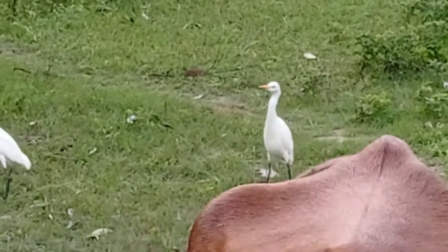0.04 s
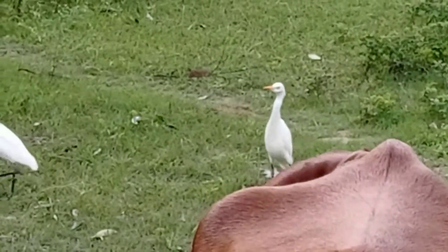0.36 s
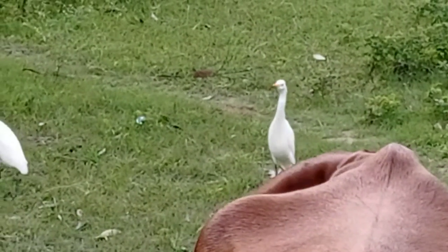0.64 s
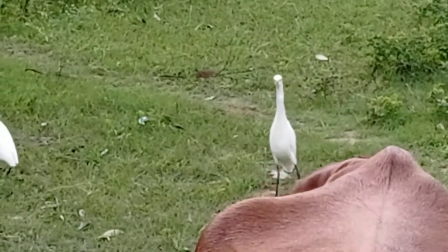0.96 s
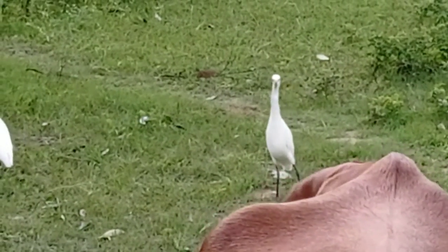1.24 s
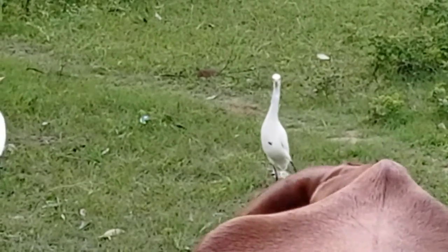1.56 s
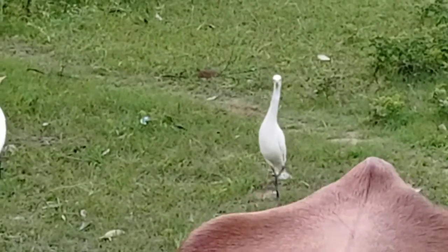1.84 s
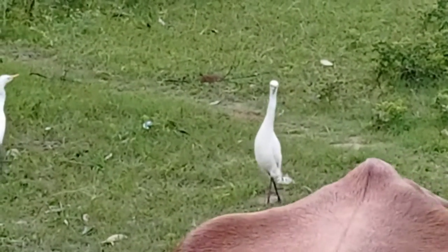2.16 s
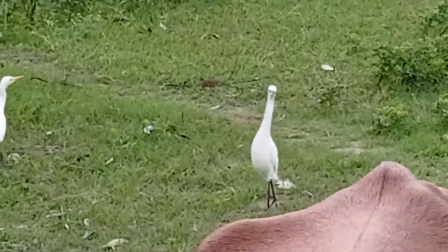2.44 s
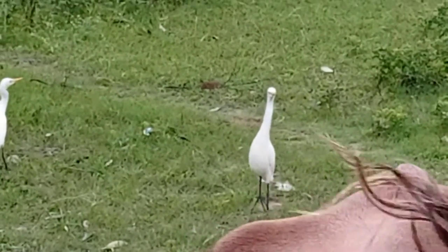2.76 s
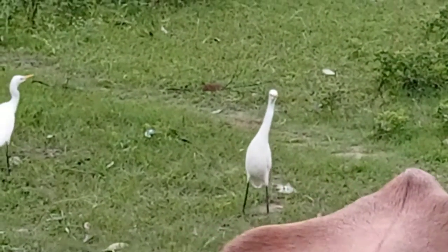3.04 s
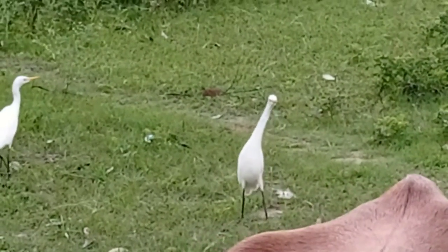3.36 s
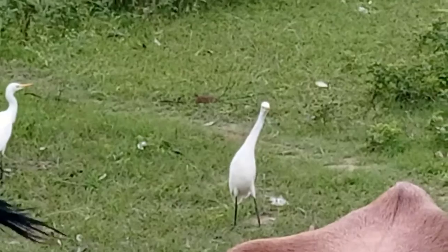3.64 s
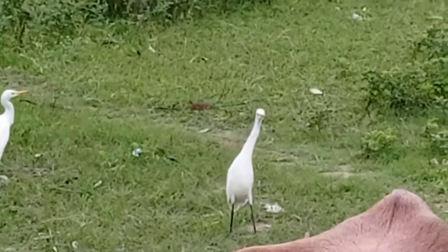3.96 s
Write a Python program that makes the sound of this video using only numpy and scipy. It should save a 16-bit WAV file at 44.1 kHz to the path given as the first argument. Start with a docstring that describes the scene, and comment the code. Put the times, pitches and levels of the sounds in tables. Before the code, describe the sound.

Small birds calling, one nearer repeating a quick phrase, with light wind on the microphone.

```python
"""Small birds call in an open pasture. From the start, wind rumbles softly under far twitters, chips and
whistles: gliding tones that the trees scatter back as a faint wash. A cow's tail swishes twice, hair
brushing hide with tiny snaps, while far chirps, trills and thin rasps join in. From 1.5 s the nearest
bird repeats a short phrase three times a second, another buzzes, and the wind gives one low thump.
Toward 4 s the near bird and the wind fade while the other birds call on."""
import sys
import numpy as np
from scipy import signal
from scipy.io import wavfile

SR = 44100
rng = np.random.default_rng(int(sys.argv[2]) if len(sys.argv) > 2 else 0)


def bounce(signal):
    """Save signal as a 16-bit WAV file at the path given by the first command-line argument."""
    frames = np.transpose(np.atleast_2d(signal))
    limited = np.clip(frames, -1, 1)
    pcm = np.round(limited * 32767).astype(np.int16)
    wavfile.write(sys.argv[1], SR, pcm)


N = 176400

# How the wind's low rumble and the field's airy rush rise and fall: time_s, level_db
RUMBLE_LEVELS = [(0, -43.5), (.6, -42), (1.1, -43.5), (1.6, -43), (2.1, -43.5), (2.8, -46.5), (3.2, -49.5),
                 (3.6, -53.5), (4, -53.5)]
RUSH_LEVELS = [(0, -58), (.9, -58.5), (1.9, -59.5), (2.6, -61), (3.2, -65), (4, -72)]
# How strong the lows and highs are in the rumble, the rush and a tail swish: frequency_hz, level_db
RUMBLE_COLOUR = [(20, -11), (35, -7.5), (48, -4.5), (59, 1.5), (75, -6.5), (100, -11), (170, -11.5),
                 (250, -21.5), (400, -34), (800, -66.5)]
RUSH_COLOUR = [(120, -6), (200, 4.5), (320, 4.5), (500, -5), (780, -0.5), (1100, -8), (1600, -13),
               (2500, -18.5), (4300, -24), (6000, -28.5), (8000, -38), (11500, -35.5), (15000, -59)]
SWISH_COLOUR = [(1000, -12), (2700, 4), (4500, 1.5), (7500, -1), (11000, -14.5), (14000, -18)]
# How alike noise is at the two ears (1 means the same): frequency_hz, likeness
EAR_LIKENESS = [(30, 1), (70, .98), (170, 0.91), (350, 0.65), (700, 0.23), (1400, -0.3), (3000, 0.11),
                (9000, 0.16)]
# Bouts of far twittering: start_s, length_s, level_db, pitch_hz, spread_octaves, notes_per_s
TWITTER_BOUTS = [(0, 0.29, -69.5, 2900, .15, 25), (0, .72, -67.5, 4300, .15, 29.6),
                 (.7, 0.48, -70, 4115, .2, 25), (2.0, 1.09, -60, 2895, .12, 30),
                 (2.32, .75, -61, 3453, 0.1194, 35), (2.35, 0.64, -69, 4350, .15, 29),
                 (3.101, .6, -69, 2900, .2, 20.4)]
# The path each kind of call follows, by name: time_in_call_s, pitch_hz, level_db
CALL_SHAPES = { "upsweep": [(0, 3300, -11), (.010, 3790, -6.5), (.019, 4560, -1.5), (.027, 5880, -3),
               (.031, 6000, -33)], "chip": [(0, 6120, -13), (.006, 5340, 2.5), (.013, 4450, 1),
               (.021, 3600, -15), (.030, 3100, -26)], "tick": [(0, 5404, -13), (.005, 4000, 1.5),
               (.012, 2900, 5), (.019, 2400, 1.5), (.023, 2420, -17)], "dip": [(0, 4200, -13),
               (.017, 3680, 1), (.042, 3485, 1.5), (.065, 3240, -3), (.084, 3233, -1.5), (.115, 3560, 0),
               (.140, 3816, 3), (.153, 3830, -30)], "hook": [(0, 5950, -9), (.009, 5100, -2),
               (.018, 4300, -1), (.035, 4020, 0.5), (.054, 4110, -6), (.073, 4260, -6.5),
               (.088, 4100, -15)], "whistle": [(0, 3127, -13), (.018, 3076, 0), (.060, 3044, -1.5),
               (.088, 3190, 3.5), (.108, 3040, -15)], "thin": [(0, 7150, -21), (.030, 7350, 2.5),
               (.070, 7360, -3), (.120, 7210, 1), (.145, 7250, -10)], "pipe": [(0, 2235, -15),
               (.014, 2210, -2), (.041, 2185, -2), (.056, 2185, -14)], "level": [(0, 3820, -3.5),
               (.025, 3804, 1), (.110, 3790, -3.5), (.160, 3760, -10)], "flick": [(0, 3950, -8),
               (.010, 4270, -2.5), (.020, 4600, -0.5), (.027, 5120, -10)], "lift": [(0, 2910, -17),
               (.030, 3190, -8), (.052, 3420, -6), (.07, 3480, -1)], }
# How much each kind of call wobbles in pitch (the rest waver slightly): shape_name, share_of_pitch
CALL_WAVER = {"upsweep": 0.041, "tick": .07, "chip": 0.013, "flick": .015, "level": .009, "thin": .004}
# Calls round the field: start_s, shape_name, level_db, pitch_ratio, right_ear_lag_cycles, wash_db
CALLS = [ (.046, "upsweep", -53, 1, 0.33, -5.5), (.206, "upsweep", -55, .97, .4, -7),
         (.371, "upsweep", -54, 1, 0.35, -7.5), (.022, "chip", -62.5, 0.62, 0.41, -1.5),
         (.183, "chip", -68, .6, 0.32, -6), (.343, "chip", -69, .62, 0.42, -7),
         (.128, "pipe", -57.5, 1, 0.5, -13), (.258, "pipe", -57.5, 1, .52, -3),
         (2.265, "pipe", -63, .97, 0.37, 4.5), (3.455, "pipe", -66, 1, .45, -8),
         (3.595, "pipe", -64.5, 1.01, 0.3, -2), (.232, "thin", -65.5, 1, 0.031, -5.5),
         (0.519, "thin", -65.5, .995, 0.047, -1), (1.786, "tick", -61, 1, .25, -5),
         (2.114, "tick", -59, 1, .25, -5), (2.435, "tick", -58.5, 1.05, .3, -4),
         (2.756, "tick", -63, 1.05, .3, -4), (3.114, "dip", -56.5, .9, 0.21, -11),
         (3.422, "dip", -54, 1, 0.22, -9), (3.289, "flick", -56.5, 1, 0.35, -1),
         (3.331, "chip", -51, 1.01, -0.33, -11), (3.612, "hook", -51.5, 1, 0.39, -9.5),
         (3.044, "lift", -56, 1.08, .29, -2), (3.738, "whistle", -59.5, 1, 0.071, -7),
         (2.755, "whistle", -62.5, 1.02, .1, 0), (3.015, "level", -63, 1.028, 0.19, -1.5),
         (3.435, "level", -60.5, 1.015, 0.23, -5.5), (3.848, "level", -65.5, 1, -0.15, -20),
         (3.422, "whistle", -59.5, .89, 0.089, -10), (3.930, "lift", -55, 1, 0.033, -8)]
# Strokes of the cow's tail: middle_s, half_length_s, level_db
TAIL_STROKES = [(0.443, 0.018, -65), (1.281, 0.021, -60)]
# Tiny dry snaps, most within the swishes: start_s, level_db, low_edge_hz
DRY_SNAPS = [(.440, -55, 2500), (.451, -58, 3000), (1.280, -59, 2000), (2.405, -65, 8500)]
# Far chirps: start_s, level_db, pitch_ratio
CHIRPS = [(.548, -66, 1), (.632, -68, 1.46), (.705, -66, 0.84), (.735, -62.5, 1.01), (.765, -69, .72),
          (.785, -62, .83), (1.08, -72, .64), (1.16, -72, 0.92), (1.295, -65, 0.84), (1.41, -69, 0.71)]
# The path of one far chirp: time_in_call_s, pitch_hz, level_db
CHIRP_SHAPE = [(0, 3597, -11), (.015, 3250, 0), (.035, 3150, 0), (.06, 3443, -7)]
# Far trills: start_s, length_s, level_db, pitch_hz, fall_share_of_pitch, notes_per_s
TRILL_RUNS = [(.85, 0.29, -67.5, 3520, .06, 40), (.66, .44, -67.5, 4550, 0.14, 40),
              (1.15, .65, -70, 3280, .03, 32), (1.96, 1.24, -61, 2950, 0.243, 27),
              (2.325, 0.12, -52.5, 3590, 0.045, 80), (2.32, .15, -71.5, 5000, .03, 57),
              (2.66, .25, -73, 5000, .04, 37)]
# High, faint rasps: start_s, length_s, level_db, pitch_hz
RASP_NOTES = [(.97, 0.087, -79, 6800), (1.11, 0.056, -73.5, 5750), (1.298, .03, -70, 7240),
              (1.388, 0.06, -74, 6580), (1.585, 0.08, -74.5, 7130), (1.785, 0.079, -77, 6900),
              (1.985, 0.061, -75, 7210), (2.175, 0.074, -78.5, 7190), (2.71, 0.081, -74, 8190),
              (2.89, .07, -78.5, 7870), (2.983, 0.082, -77.5, 6090), (3.289, 0.082, -84, 7800),
              (3.568, 0.082, -82, 8000), (3.833, 0.065, -83.5, 7930)]
# The near bird's phrases: start_s, level_db
NEAR_PHRASES = [(1.517, -52), (1.852, -45), (2.177, -46), (2.500, -46), (2.820, -49), (3.149, -50.5),
                (3.485, -54.5), (3.832, -57)]
# Its four notes (the pip comes just ahead of the start): time_in_phrase_s, pitch_hz, level_db
PIP_NOTE = [(-.032, 2500, -10.5), (-.024, 2432, -5), (-.013, 2410, -8), (-.004, 2390, -31.5)]
SLUR_NOTE = [(0, 2946, -15), (.010, 2738, -2), (.022, 2627, -0.5), (.034, 2586, 0.5), (.042, 2580, -5),
             (.048, 2630, -1)]
RISE_NOTE = [(.081, 2780, -19), (.090, 2978, -7), (.098, 3066, -6), (.105, 3235, -4), (.113, 3330, -5.5),
             (.123, 3220, -12.5)]
DROP_NOTE = [(.136, 2230, -12.5), (.143, 2170, -10), (.151, 2042, -3), (.158, 1843, -14.5),
             (.168, 1740, -18.5), (.190, 1732, -18.5)]
# Buzzy notes: start_s, level_db, pitch_hz
BUZZ_NOTES = [(1.648, -57, 4140), (1.848, -60, 4160), (2.048, -59.5, 4150), (2.245, -59.5, 4150),
              (2.288, -68.5, 5870)]

TREES_FADE_S, LEAVES_FADE_S = .9, .083   # time for scattered sound to fall by 60 dB


def from_db(db):
    """Turn decibels into a number to multiply by."""
    return 10 ** (np.asarray(db) / 20)


def unit_power(x):
    """Scale a sound so its average power is 1."""
    return x / np.sqrt(np.mean(x ** 2) + 1e-20)


def level_curve(rows):
    """Join time and level points into a gain for every sample."""
    return from_db(np.interp(np.arange(N) / SR, *np.transpose(rows)))


def at_hz(points, hz):
    """Read a table between its frequencies, with octaves evenly spaced."""
    frequencies, values = np.transpose(points)
    return np.interp(np.log(hz), np.log(frequencies), values)


def drift(turns_per_s, n):
    """A random wander, mostly between -1 and 1, n samples long."""
    points = rng.standard_normal(4096)
    return np.interp(np.arange(n) / SR * turns_per_s, np.arange(len(points)), points)


def add(out, start_s, sound):
    """Mix a stereo sound in at a given time."""
    i = max(int(start_s * SR), 0)
    out[:, i:i + sound.shape[1]] += sound[:, :max(N - i, 0)]


def banded_noise(colour, flicker_db):
    """Stereo noise in half-octave bands, each flickering on its own."""
    out, edges = 0, 17.5 * 2 ** np.arange(0, 10.1, .5)
    edges = edges[(edges > colour[0][0] / 2) & (edges < 2 * colour[-1][0])]
    white = rng.standard_normal((2, 2, N + SR // 2))
    for k, (low, high) in enumerate(zip(edges, edges[1:])):
        band = signal.butter(2, [low, high], "band", fs=SR, output="sos")
        shared, opposite = signal.sosfilt(band, white[k % 2])[:, -N:]
        hz = np.sqrt(low * high)
        alike = at_hz(EAR_LIKENESS, hz)
        gain = from_db(at_hz(colour, hz) + flicker_db * drift(14, N))
        out = out + gain * (np.sqrt(1 + alike) * shared + np.sqrt(1 - alike) * opposite * [[1], [-1]])
    return unit_power(out)


def wind():
    """Wind rumbles on the microphone and thumps once, over the broad rush of the open field."""
    rumble = level_curve(RUMBLE_LEVELS) * banded_noise(RUMBLE_COLOUR, flicker_db=1.73)
    rush = from_db(2.5) * level_curve(RUSH_LEVELS) * banded_noise(RUSH_COLOUR, flicker_db=.94)
    peak_s, rise_s, fall_s, thump_hz = 1.846, .014, .029, 56.8
    t = np.arange(N) / SR - peak_s
    swell = np.exp(-(t / np.where(t < 0, rise_s, fall_s)) ** 2)
    thump = from_db(-27) * swell * np.cos(2 * np.pi * thump_hz * t)
    return (rumble + rush + thump) * from_db([[-.28], [.28]])   # a touch louder on the right


def bird_tone(hz, gain, lag_cycles, waver, rough):
    """A nearly pure voice, later in the right ear; waver shakes its pitch, rough its loudness."""
    n = len(hz)
    cycles = np.cumsum(hz * (1 + waver * drift(300, n))) / SR
    phase = 2 * np.pi * (cycles - np.array([[0], [lag_cycles]]))
    soft_ends = signal.windows.tukey(n, min(1, .004 * SR / n))
    return gain * (1 + rough * drift(300, n)) * soft_ends * np.sin(phase)


def wash(sound, fade_s):
    """Trees and bushes scatter a sound into a dying blur, different at each ear."""
    t, build_s = np.arange(SR) / SR, .012
    tail = rng.standard_normal((2, SR)) * from_db(-60 * t / fade_s) * (1 - np.exp(-t / build_s))
    return signal.fftconvolve(sound, unit_power(tail) / np.sqrt(SR), axes=1)[:, :N]


def twitters():
    """Unevenly spaced little notes, each with its own pitch, glide, strength and direction."""
    out = np.zeros((2, N))
    note_s, glide_octaves, spread_db = .0319, .2, 4
    through_note = np.linspace(-.5, .5, int(note_s * SR))
    for start_s, length_s, db, hz, spread_octaves, notes_per_s in TWITTER_BOUTS:
        for k, (late, pitch, glide, strength, side) in enumerate(rng.uniform(-1, 1, (48, 5))):
            offset_s = (k + .5 + .5 * late) / notes_per_s
            gain = from_db(db + spread_db * strength) * np.cos(np.pi * through_note)
            glide_hz = hz * 2 ** (spread_octaves * pitch + glide_octaves * glide * through_note)
            note = bird_tone(glide_hz, gain, lag_cycles=.31 * side, waver=.012, rough=.27)
            if offset_s < length_s:
                add(out, start_s + offset_s, note)
    return from_db(-3.5) * out + from_db(-2.5) * wash(out, TREES_FADE_S)


def sing(shape, pitch_ratio, lag_cycles, waver, rough):
    """One note that glides along a table of pitches and levels."""
    times, hz, db = np.transpose(shape)
    t = times[0] + np.arange(int((times[-1] - times[0]) * SR)) / SR
    gain = from_db(np.interp(t, times, db))
    return bird_tone(pitch_ratio * np.interp(t, times, hz), gain, lag_cycles, waver, rough)


def through_foliage(direct, to_trees):
    """Leaves add a short smear to a call, and trees a longer wash."""
    return direct + from_db(-8.5) * wash(direct, LEAVES_FADE_S) + wash(to_trees, TREES_FADE_S)


def field_calls():
    """Single chips and whistles from birds all round the field."""
    direct, to_trees = np.zeros((2, 2, N))
    for start_s, name, db, pitch_ratio, lag_cycles, wash_db in CALLS:
        waver = CALL_WAVER.get(name, .006)
        call = from_db(db) * sing(CALL_SHAPES[name], pitch_ratio, lag_cycles, waver, rough=.27)
        add(direct, start_s, call)
        add(to_trees, start_s, from_db(wash_db) * call)
    return through_foliage(direct, to_trees)


def tail_swishes():
    """The hairs of a cow's tail brush over its hide in a brief, grainy hiss."""
    t = np.arange(N) / SR
    strokes = sum(from_db(db) * np.exp(-((t - middle_s) / half_s) ** 2)
                  for middle_s, half_s, db in TAIL_STROKES)
    grain = from_db(3.7 * drift(350, N))
    return strokes * grain * banded_noise(SWISH_COLOUR, flicker_db=-2)


def snaps():
    """Bright bursts of noise that die within milliseconds."""
    out, t, decay_s = np.zeros((2, N)), np.arange(N) / SR, .0015
    fade = np.exp(-np.minimum(t / decay_s, 20))
    for start_s, db, low_edge_hz in DRY_SNAPS:
        burst = from_db(db) * fade * rng.standard_normal((2, N))
        keep_highs = signal.butter(2, low_edge_hz, "high", fs=SR, output="sos")
        add(out, start_s, signal.sosfilt(keep_highs, burst))
    return out


def far_chirps():
    """Hoarse, distant chirps that dip in pitch and lift again."""
    out = np.zeros((2, N))
    for start_s, db, pitch_ratio in CHIRPS:
        chirp = sing(CHIRP_SHAPE, pitch_ratio, lag_cycles=.14, waver=.026, rough=.5)
        add(out, start_s, from_db(db) * chirp)
    return through_foliage(from_db(-1.5) * out, from_db(-4) * out)


def far_trills():
    """Runs of quick falling notes, blurred by distance."""
    out = np.zeros((2, N))
    for start_s, length_s, db, hz, fall, notes_per_s in TRILL_RUNS:
        n = int(length_s * SR)
        through_note = np.cumsum(notes_per_s * (1 + .15 * drift(20, n))) / SR % 1
        gain = from_db(db) * np.sin(np.pi * through_note) * signal.windows.tukey(n, .25)
        falling_hz = hz * (1 + fall * (.5 - through_note))
        add(out, start_s, bird_tone(falling_hz, gain, lag_cycles=0, waver=.02, rough=.3))
    return from_db(-6.5) * out + wash(out, TREES_FADE_S)


def rasps():
    """Thin, hoarse notes of a tiny far bird, heard only as scattered sound."""
    out = np.zeros((2, N))
    for start_s, length_s, db, hz in RASP_NOTES:
        n = int(length_s * SR)
        sagging_hz = hz * np.linspace(1.02, .98, n)
        gain = from_db(db) * signal.windows.tukey(n, .9)
        add(out, start_s, bird_tone(sagging_hz, gain, lag_cycles=0, waver=.035, rough=1))
    return wash(out, LEAVES_FADE_S) + from_db(-8) * wash(out, TREES_FADE_S)


def near_bird():
    """Phrases of pip, slur, rise and drop swell, then fade. The first has no pip."""
    out, echo_s = np.zeros((2, N)), .03
    loudest_db = max(db for _, db in NEAR_PHRASES)
    for k, (start_s, db) in enumerate(NEAR_PHRASES):
        ending_db = loudest_db + .87 * (db - loudest_db)   # the last two notes swell and fade less
        notes = [(SLUR_NOTE, db), (RISE_NOTE, ending_db), (DROP_NOTE, ending_db)]
        if k > 0:
            notes.append((PIP_NOTE, db))
        for shape, note_db in notes:
            waver = .025 if shape is DROP_NOTE else .009   # the last note is hoarser
            note = sing(shape, 1 + .003 * rng.normal(), lag_cycles=.19, waver=waver, rough=.23)
            add(out, start_s + shape[0][0], from_db(note_db) * note)
    add(out, echo_s, from_db(-17) * out)
    return out + from_db(-9) * wash(out, fade_s=.89) + from_db(-13) * wash(out, LEAVES_FADE_S)


def buzzes():
    """Bird notes that start plain and break into a fast warble."""
    length_s, warble_hz, depth_hz = .061, 230, 412
    out, t = np.zeros((2, N)), np.arange(int(length_s * SR)) / SR
    warble = depth_hz * np.minimum(2 * t / length_s, 1) ** 2 * np.sin(2 * np.pi * warble_hz * t)
    swell = np.sqrt(np.sin(np.pi * t / length_s))
    for start_s, db, hz in BUZZ_NOTES:
        note = bird_tone(hz + warble, swell, lag_cycles=-.31, waver=.015, rough=.3)
        add(out, start_s, from_db(db) * note)
    return out + from_db(-4) * wash(out, TREES_FADE_S)


def scene():
    """Add up all the sounds of the pasture."""
    return (wind() + twitters() + field_calls() + tail_swishes() + snaps()
            + far_chirps() + far_trills() + rasps() + near_bird() + buzzes())


def record(dry):
    """Soften both ends and steeply cut the highest treble."""
    cutoff_hz = 12000
    eased = dry * signal.windows.tukey(N, .002)
    return signal.sosfilt(signal.ellip(10, .2, 70, cutoff_hz, fs=SR, output="sos"), eased)


dry = scene()
out = record(dry)
bounce(out)
```